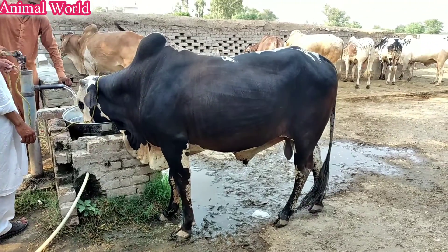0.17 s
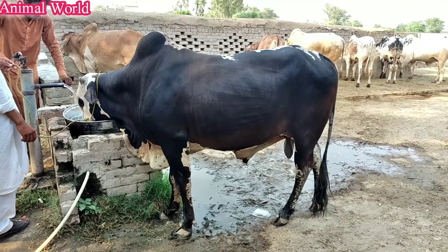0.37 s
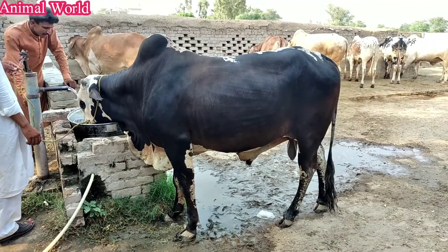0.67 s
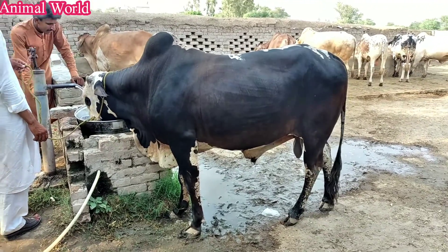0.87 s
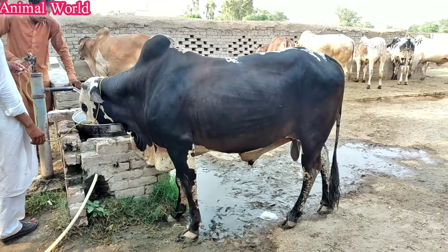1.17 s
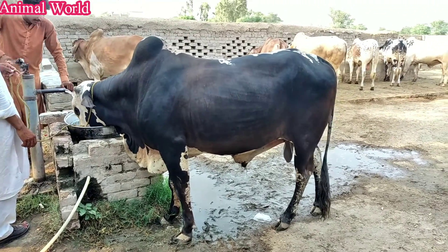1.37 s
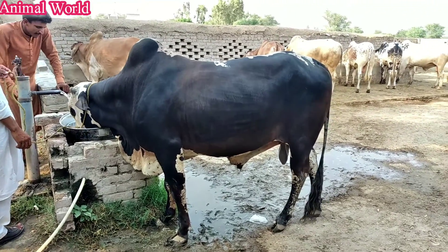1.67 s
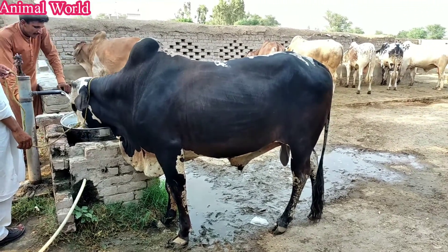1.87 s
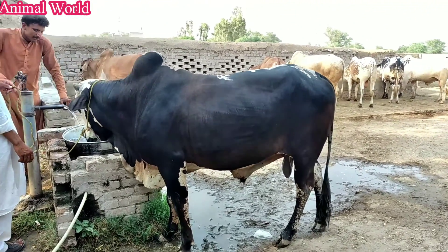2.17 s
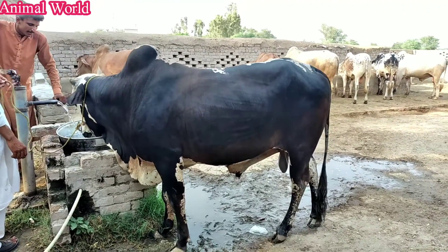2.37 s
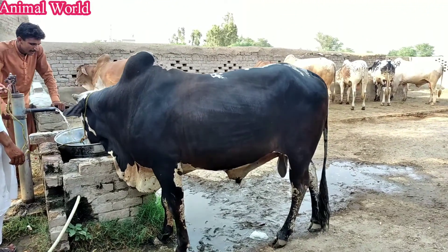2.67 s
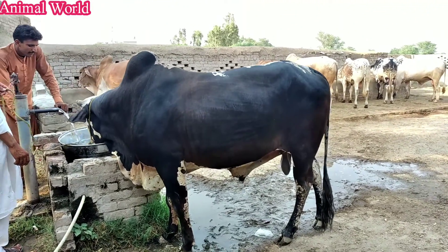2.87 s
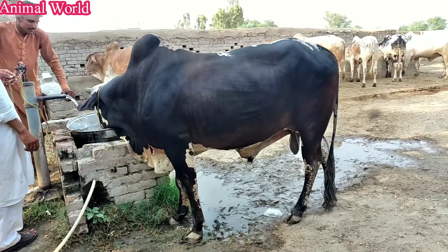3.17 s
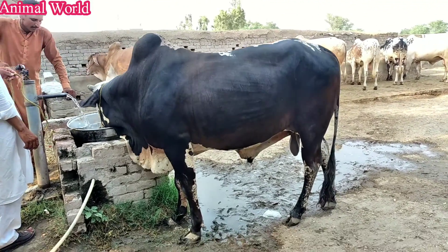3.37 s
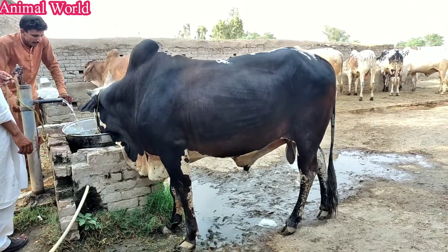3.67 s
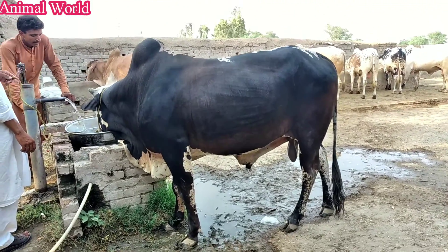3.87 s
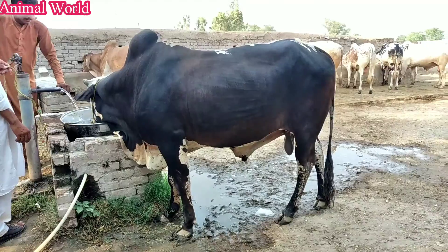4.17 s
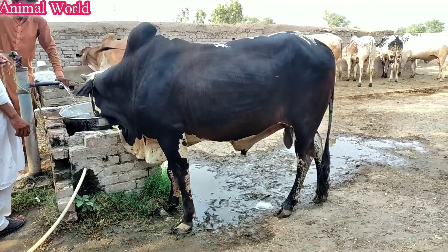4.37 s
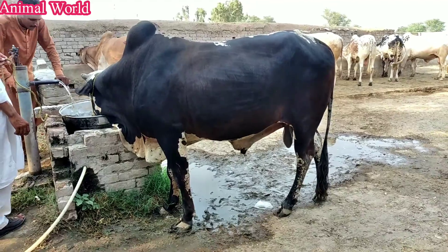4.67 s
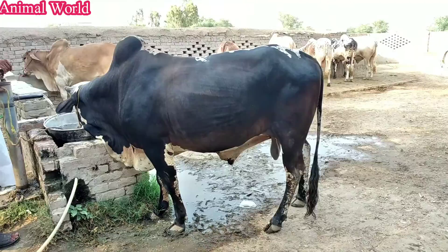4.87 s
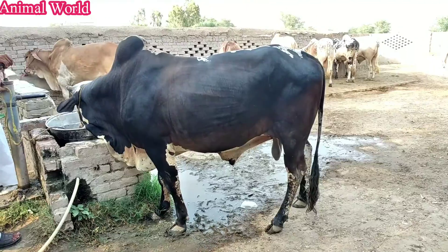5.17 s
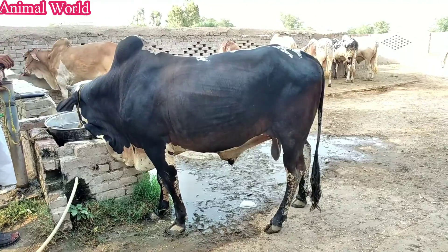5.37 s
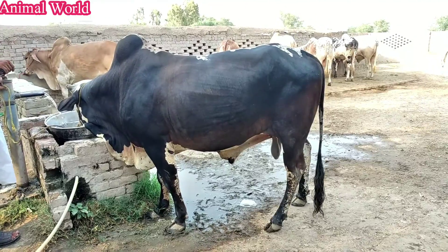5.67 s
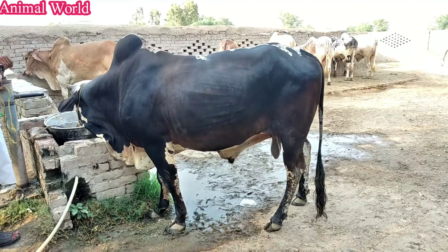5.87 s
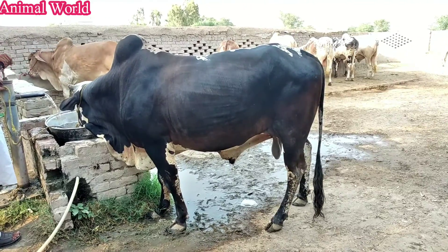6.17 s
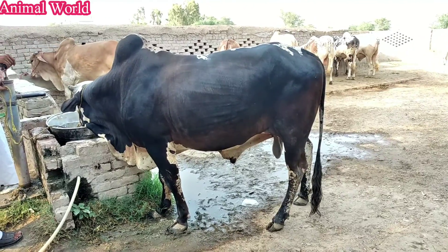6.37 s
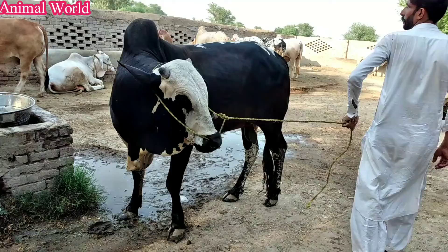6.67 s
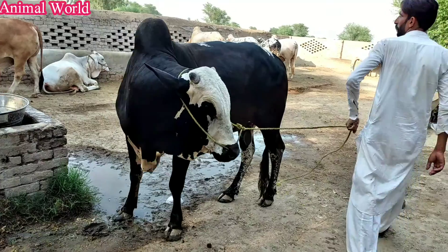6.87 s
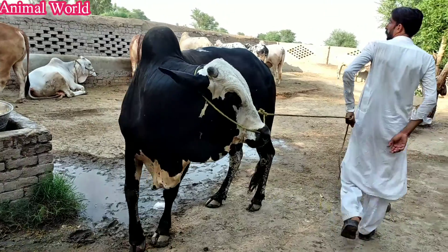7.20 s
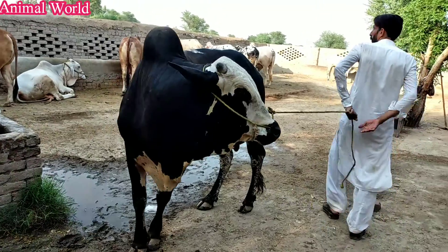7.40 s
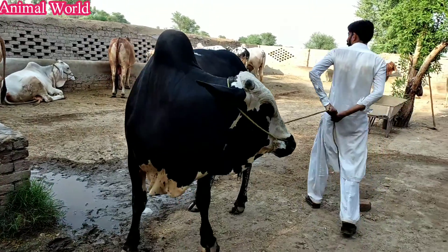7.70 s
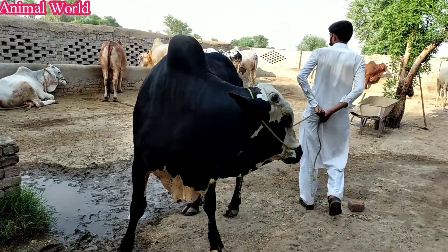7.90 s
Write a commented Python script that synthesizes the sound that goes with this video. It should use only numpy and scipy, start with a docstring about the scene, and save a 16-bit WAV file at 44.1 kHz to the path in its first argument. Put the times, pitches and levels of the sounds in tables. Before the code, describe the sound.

Rhythmic ringing knocks and rattles of a hand water pump, its pipe booming and gurgling over a faint yard murmur.

```python
"""Iron knocks, rattles and scrapes: a hand pump is worked beside a drinking bull in an open farm yard.
Rod and handle set the iron ringing; the air in the pipe booms at a pitch set by the water, which glugs
and sprays. The pivot squeaks, brick walls answer, the yard murmurs and a far engine beats for a while.
We listen from three spots in turn, through two microphone ports and a noise suppressor that shuts
the treble between strokes."""
import sys
import numpy as np
from scipy import signal
from scipy.io import wavfile
from scipy.ndimage import uniform_filter1d, minimum_filter1d

SR = 44100
rng = np.random.default_rng(int(sys.argv[2]) if len(sys.argv) > 2 else 0)


def dump(signal):
    """Clip the signal to [-1, 1] and save it as 16-bit WAV at the path in sys.argv[1]."""
    limited = np.clip(np.atleast_2d(signal).T, -1, 1)
    pcm = np.round(limited * 32767).astype(np.int16)
    wavfile.write(sys.argv[1], SR, pcm)


N = 354475

# Blows of rod and handle. Each row: start in seconds, body, ring and treble in relative dB, clank in Hz.
BLOWS = [(0.025, -41, -44, -37, 2220), (0.08, -28.5, -35.5, -27.5, 1390), (0.183, -24.5, -29, -28, 1960),
         (0.2175, -34, -64, -32, 1600), (0.4267, -39.5, -33.5, -36.5, 1320),
         (0.4812, -39, -37, -38.5, 2000), (0.508, -30.5, -20, -27, 2390), (0.532, -28.5, -20.5, -33, 2370),
         (0.5431, -18, -22.5, -29, 2490), (0.5766, -34, -40.5, -58, 2830), (0.8573, -33.5, -69, -42, 2020),
         (0.9358, -44.5, -35.5, -85, 2070), (1.0743, -34, -70, -38.5, 2660), (1.1553, -53, -37, -34, 1354),
         (1.194, -21, -26.5, -26, 2560), (1.232, -34.5, -39, -35.5, 2410),
         (1.457, -46.5, -43.5, -45.5, 1390), (1.5337, -34, -34, -28, 2500), (1.589, -20, -29.5, -33, 2530),
         (2.125, -32.5, -74, -37.5, 2566), (2.188, -27.5, -36, -33, 2420), (2.214, -28.5, -34, -29, 2030),
         (2.2683, -24.5, -24, -31.5, 2430), (2.301, -34, -35, -29.5, 2430), (2.487, -39, -37, -47.5, 1620),
         (2.5405, -35.5, -26, -34, 2700), (2.5889, -30, -21.5, -31.5, 1460), (2.613, -16.5, -63, -27, 2216),
         (3.0744, -43, -63, -41.5, 1750), (3.133, -27.5, -65, -30, 1720), (3.147, -30, -66, -41, 2750),
         (3.2022, -32, -24, -27, 1351), (3.239, -31, -41, -28, 1404), (3.26, -57, -37, -32, 2200),
         (3.276, -21.5, -38, -29, 2370), (3.312, -41, -59, -35.5, 1630), (3.49, -37.5, -41.5, -65, 1500),
         (3.5564, -25.5, -27.5, -30.5, 1630), (3.6112, -18, -50, -28, 1740),
         (4.1267, -35, -45.5, -40.5, 2506), (4.1971, -24, -23, -25.5, 1350),
         (4.252, -20, -25.5, -24.5, 1345), (4.4855, -42.5, -33, -44, 1440),
         (4.5399, -30, -19.5, -33.5, 1680), (4.591, -26.5, -39, -27, 1660), (4.6073, -19, -23.5, -57, 2370),
         (4.9415, -38, -37, -69, 1560), (4.9746, -41.5, -25, -51, 2650), (5.023, -10.5, -17, -33, 2630),
         (5.486, -26, -39, -46, 2560), (5.496, -18.5, -17.5, -45, 2550), (5.612, -32, -63, -32.5, 2470),
         (5.7698, -19, -33, -41, 2350), (5.8, -22, -25.5, -43, 2270), (5.849, -41.5, -30.5, -34, 2060),
         (5.92, -24, -46, -31.5, 2620), (5.9474, -12.5, -22, -31.5, 1700), (6.4274, -37, -44, -60, 1820),
         (6.7308, -28.5, -29, -73, 1336), (6.769, -33.5, -27, -48, 2626), (6.839, -43, -64, -29, 2570),
         (6.8775, -32, -41, -52, 1670), (6.889, -66, -68, -28.5, 2580), (6.9524, -65, -44, -33, 2350),
         (6.986, -35, -43, -29, 2600), (6.994, -21, -25, -25.5, 2590), (7.023, -42.5, -30.5, -35, 1510),
         (7.2, -43.5, -46, -35, 1544), (7.2568, -35, -47, -22.5, 2490), (7.276, -22.5, -18, -57, 1790),
         (7.308, -13.5, -23, -26.5, 2305), (7.4107, -40, -59, -36, 1940), (7.6475, -17.5, -52, -27, 1870),
         (7.6667, -24.5, -19.5, -62, 1670), (7.717, -49, -24.5, -62, 1720)]
# The handle's modes, main ring first. Each row: pitch in Hz, relative dB, nominal t60 in seconds.
IRON_MODES = [(1071, 0, .065), (870, -18, .04), (1240, -20, .03), (1830, -24, .05), (2620, -18, .05)]
# Tone of the clatter and of the spray. Each row: frequency in Hz, relative level in dB.
CLATTER_EQ = [(47, -53.5), (80, -20.5), (232, -16.5), (404, -0.5), (643, -19), (1070, -4), (1170, -5),
              (1860, -4.5), (2380, -3.5), (3030, -9.5), (6740, -9.5), (16000, -32)]
SPRAY_EQ = [(3000, -38.5), (4600, -35), (5200, -10.5), (6000, -13), (7300, -11), (8200, -22.5),
            (11300, -20.5), (13000, -47.5), (16000, -51.5)]
# Water fizzing from the spout. Each row: time in seconds, relative level in dB.
TRICKLE_FADER = [(6.8, -87), (6.84, -64.5), (7.75, -49.5), (7.84, -97)]
# Hollow notes of the air above the water. Each row: start in seconds, level in dB, pitch in Hz.
PIPE_NOTES = [(0.003, -33, 377), (0.085, -28, 349.5), (0.184, -34, 425), (0.486, -29.5, 489.7),
              (0.546, -34.5, 288), (0.863, -40, 356), (0.939, -36, 399), (1.086, -43, 321),
              (1.195, -34, 423), (1.468, -41.5, 394), (1.536, -33, 467), (1.591, -23, 366.5),
              (2.146, -43, 294), (2.261, -31.5, 304), (2.488, -38.5, 417), (2.543, -31.5, 407),
              (2.569, -27, 491), (2.616, -21.5, 260.8), (2.66, -32.5, 258), (2.71, -35.5, 258),
              (3.272, -28, 423.5), (3.485, -40.5, 410), (3.56, -28.5, 411), (3.608, -27.5, 447),
              (4.255, -26.5, 353.4), (4.485, -34.5, 414.3), (4.537, -28, 396), (4.605, -34.5, 337),
              (4.647, -30, 331), (5.03, -38.5, 395), (5.496, -55, 375), (5.951, -37.5, 490),
              (6.993, -28.5, 397), (7.203, -37.5, 429), (7.312, -14, 412.3), (7.367, -31, 433),
              (7.668, -20.5, 370)]
# Low knocks of the stand. Each row: start in seconds, level in dB, pitch in Hz.
STAND_THUMPS = [(0.545, -14.5, 129), (1.6, -28.5, 145.6), (1.897, -27.5, 174.4), (2.275, -25.5, 125),
                (2.619, -25.5, 130.8), (3.275, -16, 122.8), (4.259, -24, 225), (6.732, -20.5, 147),
                (6.998, -16.5, 123.4)]
# Glugs in the pipe. Each row: start and length in seconds, level in dB.
GLUGS = [(0.533, 0.074, -32.5), (1.573, 0.075, -31), (3.583, 0.1, -32), (4.59, 0.061, -32.5),
         (7.259, 0.039, -32), (7.691, 0.037, -28)]
# Thin squeaks. Each row: start and length in seconds, level in dB, opening pitch in Hz.
PIVOT_SQUEAKS = [(2.95, 0.137, -62, 2530), (3.452, 0.14, -59.5, 2655), (5.717, 0.054, -48, 1520)]
# Wavering tones in the murmur. Each row: pitch and width in Hz, level in dB.
MURMUR_TONES = [(668, 41, -71), (1030, 220, -59)]
# Tone of the murmur. Each row: frequency in Hz, relative level in dB.
YARD_EQ = [(22, -7.5), (45, 2), (108, -18.5), (256, -9), (510, -9), (665, -7), (1610, -14.5), (1800, -10.5),
           (2630, -25.5), (3350, -25.5), (5000, -29), (6500, -65), (11000, -120)]
# The far engine. Each row: time in seconds, level in dB.
ENGINE_FADER = [(4.88, -103), (4.92, -56), (6.0, -56.5), (6.7, -65), (6.74, -86)]
# Listening spots. Each row: start in seconds, lag of the left port in samples.
LISTENING_SPOTS = [(0, 10.5), (4.9, 20), (6.72, 14.5)]
# The pump's colour at the middle spot. Each row: frequency in Hz, relative level in dB.
MIDDLE_SPOT_EQ = [(300, -6), (1000, -3.5), (2600, 1.5), (4000, -4), (8000, -10.5), (11000, 1),
                  (16000, -21.5)]
# Stereo tilt. Each row: frequency in Hz, left over right in dB.
PORT_BALANCE = [(60, -3.5), (300, 1), (700, -2), (1400, 3.5), (3000, 3.5), (6000, 18.5), (8500, -2),
                (15000, -10)]
# Stereo focus. Each row: frequency in Hz, likeness of the ports from 0 to 1.
PORT_LIKENESS = [(60, 0.31), (300, 1), (1150, 0.93), (1600, 0.54), (4000, 0.14), (15000, 0.039)]

REF_BLOW_DB, RATTLE_T60_S = -27, 0.23  # a medium blow and its decay
RATTLE_SHORTENS, RISE_SHORTENS = 0.3, 0.45  # harder blows seat and rise sooner: dB of time per dB
TREBLE_T60_S, THUMP_T60_S = 0.11, 0.056
BODY_CRACK_DB, TREBLE_CRACK_DB, CRACK_T60_S = 7, 10.5, 0.024  # first crack above the rattle
SCRAPE_DB, SCRAPE_DB_PER_S = -10, 601.5  # the scrape into a blow: last level re the blow, growth
STILL_AFTER_S = 0.055  # after this long a rest, a blow's attack rises from silence
BOOM_REF_HZ, BOOM_LOW_LINGERS = 420, 0.48  # deeper notes last longer: power of pitch
BOOM_HOLD_S, BOOM_CLOSE_S, BOOM_SAG_DB_PER_S = 0.046, 0.008, 132.5  # at BOOM_REF_HZ
BOOM_AFTER_DB, BOOM_T60_S = -13.5, 0.27  # faint after-ring, at BOOM_REF_HZ
SQUEAK_RISE = 0.062  # share by which the pitch climbs
CLICK_S, CLICK_DB, CLICK_HALF_WIDTH_S = 6.7327, -1.5, 0.0003
YARD_DB, BAND_LIMIT_HZ = -54, 15950


def pump():
    """Rattling blows drive the iron's modes, the loose rod's clank, a broad clatter and the spray."""
    (body, ring, treble), clank_hz = blows()
    t = np.arange(N) / SR
    rattle = contacts(per_s=1200, spread_db=5.5)
    low = body * rattle
    high = treble * contacts(per_s=690, spread_db=3.5)
    sway = wander(rng.standard_normal(N), 1200)  # the loose rod never sits still
    out = iron(body, ring, rattle, sway)
    out += amp(-1) * resonate(low, clank_hz * (1 + 0.013 * sway), 80)
    for drive, side in (low, "low"), (high, "high"):
        crossover = signal.butter(3, 3300, side, fs=SR, output="sos")
        out += amp(6.5) * signal.sosfilt(crossover, coloured(drive, CLATTER_EQ))
    out += spray(treble, rattle)
    at_middle = (t > LISTENING_SPOTS[1][0]) & (t < LISTENING_SPOTS[2][0])
    top_mode = amp(-7) * ring * sine(IRON_MODES[-1][0] * (1 + 0.01 * sway))  # faces the middle spot
    return np.where(at_middle, amp(-9) * coloured(out + top_mode, MIDDLE_SPOT_EQ), out)


def blows():
    """The rod scrapes in, cracks and seats: body, ring and treble envelopes, and the held clank pitch."""
    drive, t = np.zeros((3, N + SR)), np.arange(SR // 4) / SR
    seated_db = -60 * np.maximum(t - 0.062, 0) / 0.056  # seating stops the rattle
    crack = 1 + amp([[BODY_CRACK_DB], [-60], [TREBLE_CRACK_DB]] - 60 * t / CRACK_T60_S)
    previous = -1
    for start, db, ring_db, treble_db, _ in BLOWS:
        at = round(start * SR)
        t60 = RATTLE_T60_S * amp(-RATTLE_SHORTENS * (db - REF_BLOW_DB))
        fade_db = -60 * t / np.array([[t60], [min(t60, IRON_MODES[0][2])], [TREBLE_T60_S]])
        onset_db = SCRAPE_DB if start - previous < STILL_AFTER_S else -60
        softness = amp(-RISE_SHORTENS * (max(db, treble_db) - REF_BLOW_DB))
        rise_s = softness * np.array([[0.0035], [0.004], [0.0045]])
        attack = 1 - (1 - amp([[onset_db], [-60], [onset_db]])) * np.exp(-t / rise_s)
        levels_db = [[db - 10], [ring_db + 10.5], [treble_db - 8.5]]
        drive[:, at:at + len(t)] += attack * crack * amp(fade_db + seated_db + levels_db)
        scrape_db = SCRAPE_DB - SCRAPE_DB_PER_S * t[:at][::-1]
        drive[::2, at - len(scrape_db):at] += amp(scrape_db + [[db - 10], [treble_db - 13]])
        previous = start
    starts, *_, clank_hz = np.transpose(BLOWS)
    latest = np.maximum(np.searchsorted(starts, np.arange(N) / SR) - 1, 0)
    return drive[:, :N], clank_hz[latest]


def iron(body, ring, rattle, sway):
    """The handle rings with one clear tone and a faint lower partial; rattle keeps its modes alive."""
    t = np.arange(N) / SR
    width_times_t60 = np.log(1000) / np.pi
    (hz, db, t60), *other_modes = IRON_MODES
    phase = 2 * np.pi * hz * t
    out = amp(db + 2.5) * ring * (np.sin(phase) + 0.17 * np.sin(0.84 * phase))
    shake = (ring + 0.21 * body) * rattle
    # the gripping hand blurs the main mode
    out += amp(db - 10) * resonate(shake, hz * (1 + 0.035 * sway), 2 * width_times_t60 / t60)
    for hz, db, t60 in other_modes:
        out += amp(db - 5.5) * resonate(body * rattle, hz, width_times_t60 / t60)
    return out


def pipe_booms():
    """Each jolt sounds the air column: an unsteady note that holds until the water closes over it."""
    out, t = np.zeros(N + SR), np.arange(SR // 3) / SR
    wobbles, flutters, sloshes = rng.standard_normal((len(PIPE_NOTES), 3, len(t))).transpose(1, 0, 2)
    motion = zip(wander(wobbles, 500), wander(flutters, 350), unit_rms(band(sloshes, 110, 650)))
    for (start, db, hz), (wobble, flutter, slosh) in zip(PIPE_NOTES, motion):
        age = t * (hz / BOOM_REF_HZ) ** BOOM_LOW_LINGERS
        closing = 1 + np.exp(np.minimum((age - BOOM_HOLD_S) / BOOM_CLOSE_S, 50))
        held = amp(-BOOM_SAG_DB_PER_S * age) / closing
        tail = amp(BOOM_AFTER_DB - 60 * age / BOOM_T60_S)
        attack = 1 - np.exp(-t / 0.0018)
        note = amp(2.3 * flutter) * sine(hz * (1 + 0.041 * wobble)) + 0.36 * slosh * np.exp(-t / 0.034)
        place(out, start, amp(db) * attack * (held + tail) * note)
    return out[:N]


def stand_thumps():
    """Short low pushes of the pump stand put weight under the blows."""
    out, t = np.zeros(N + SR), np.arange(SR // 4) / SR
    attack = 1 - np.exp(-t / 0.0051)
    for start, db, hz in STAND_THUMPS:
        place(out, start, attack * amp(db - 60 * t / THUMP_T60_S) * np.sin(2 * np.pi * hz * t))
    return out[:N]


def glugs():
    """Large short bubbles of random size glug in the pipe after the heavy strokes."""
    t, out = np.arange(N) / SR, np.zeros(N)
    gate = sum(amp(db) * np.clip((t - start) / 0.0056, 0, 1)
               * np.clip((start + length - t) / 0.013 + 1, 0, 1) for start, length, db in GLUGS)
    pops = amp(5.3 * rng.standard_normal(N)) * (rng.random(N) < 300 / SR)
    size = rng.integers(0, 6, N)
    for k, hz in enumerate(np.geomspace(240, 680, num=6)):
        cycles = np.arange(0, 12, hz / SR)
        envelope = (1 - np.exp(-cycles)) * np.exp(-cycles / 3.1)
        bubble = envelope * np.sin(2 * np.pi * cycles * (1 + 0.009 * cycles))
        out += signal.oaconvolve(pops * (size == k), bubble)[:N]
    return gate * unit_rms(out)


def spray(jolts, rattle):
    """Each jolt throws a spray that fizzes out; late on, the spout trickles and sloshes in the bowl."""
    fade = amp(-60 / (0.3 * SR)) ** 2  # t60 of 0.3 s
    trickle = fader(TRICKLE_FADER)
    envelope = np.sqrt(signal.lfilter([1 - fade], [1, -fade], jolts ** 2) + trickle ** 2)
    slosh = trickle * unit_rms(band(rattle, 790, 2200))
    fizz = coloured(envelope * contacts(per_s=1500, spread_db=5.5), SPRAY_EQ)
    return amp(-4.5) * slosh + amp(-5) * fizz


def pivot_squeaks():
    """The pivot gives short fluttering whistles that swell, climb and fade."""
    out = np.zeros(N + SR)
    for start, length, db, hz in PIVOT_SQUEAKS:
        progress = np.arange(0, length, 1 / SR) / length
        flutter_db = 8.1 * wander(rng.standard_normal(len(progress)), 150)
        whistle = sine(hz * (1 + SQUEAK_RISE * progress))
        place(out, start, amp(db + flutter_db) * np.sin(np.pi * progress) * whistle)
    return out[:N]


def left_click():
    """A sharp click, almost only on the left, as the listening spot changes."""
    pulse = np.exp(-0.5 * ((np.arange(N) / SR - CLICK_S) / CLICK_HALF_WIDTH_S) ** 2)
    return amp([[CLICK_DB], [CLICK_DB - 46]]) * pulse


def wall_echoes(x):
    """Sparse echoes from low brick walls, a separate pattern for each port."""
    taps = np.zeros((2, SR // 3))
    grid = np.arange(80, SR // 3 - 20, 20)
    arrivals = grid + rng.integers(0, 20, (2, len(grid)))
    np.put_along_axis(taps, arrivals, rng.choice([-1., 1.], arrivals.shape), 1)
    taps *= amp(-60 * np.arange(SR // 3) / SR / 0.17)  # t60 of 0.17 s
    return signal.oaconvolve(x[None], taps / np.linalg.norm(taps[0]), axes=1)[:, :N]


def murmur_tones():
    """Faint wavering tones: noise in slowly drifting resonances."""
    drifts, swells, noises = rng.standard_normal((len(MURMUR_TONES), 3, N)).transpose(1, 0, 2)
    voices = zip(MURMUR_TONES, wander(drifts, 9000), wander(swells, 6000), noises)
    return sum(amp(db + 4.2 * swell) * resonate(noise, hz * (1 + 0.021 * drift), width)
               for (hz, width, db), drift, swell, noise in voices)


def yard_murmur():
    """A patchy bed of wind, trickling water and herd."""
    frames, hz = N // 256 + 5, np.fft.rfftfreq(1024, 1 / SR)
    noise = rng.standard_normal((frames, 513, 5)).T
    left, apart = noise[0] + 1j * noise[1], noise[2] + 1j * noise[3]
    patches_db = 3.2 * wander(uniform_filter1d(noise[4], 8, axis=0), 10)
    likeness = at_hz([(50, 0.92), (300, 0.86), (800, -0.047), (1500, -0.6), (5000, 0.77)], hz)[:, None]
    right = likeness * left + np.sqrt(1 - likeness ** 2) * apart
    spectra = np.array([left, right]) * amp(at_hz(YARD_EQ, hz)[:, None] + patches_db)
    bed = unit_rms(signal.istft(spectra, nperseg=1024, noverlap=768)[1][:, :N])
    return amp([[YARD_DB + 0.5], [YARD_DB - 0.5]]) * bed


def far_engine():
    """Uneven firings blur into a low, beating rumble."""
    firing_hz = 20.5 * (1 + 6 * uniform_filter1d(rng.standard_normal(N), 2000))
    firings = np.diff(np.floor(np.cumsum(firing_hz) / SR), prepend=0) * amp(2.8 * rng.standard_normal(N))
    rough = unit_rms(firings) + 1.5 * rng.standard_normal(N)
    return fader(ENGINE_FADER) * unit_rms(band(band(rough, 55, 180), 55, 180))


def ports(x):
    """The left port hears later and is shaded differently; part of each band reaches it scattered."""
    hz, t, spectrum = signal.stft(x, SR, nperseg=512)
    starts, lags = np.transpose(LISTENING_SPOTS)
    lag = lags[np.searchsorted(starts, t, "right") - 1]
    likeness = at_hz(PORT_LIKENESS, hz)[:, None]
    band_phase = np.exp(2j * np.pi * rng.random((len(hz) // 4 + 1, 1))).repeat(4, 0)[:len(hz)]
    time_phase = 1j ** rng.integers(0, 4, len(t) // 8 + 1).repeat(8)[:len(t)]
    left = spectrum * (likeness + np.sqrt(1 - likeness ** 2) * band_phase * time_phase)
    left *= np.exp(-2j * np.pi * hz[:, None] * lag / SR)
    tilt = amp(at_hz(PORT_BALANCE, hz)[:, None] / 2)
    return signal.istft(np.array([left * tilt, spectrum / tilt]), SR, nperseg=512)[1][:, :N]


def contacts(per_s, spread_db):
    """Uneven tiny impacts over a little smooth rubbing."""
    hits = amp(spread_db * np.minimum(rng.exponential(1, N), 3.5)) * (rng.random(N) < per_s / SR)
    return unit_rms(unit_rms(hits * rng.choice([-1., 1.], N)) + 0.5 * rng.standard_normal(N))


def resonate(x, hz, width_hz):
    """A resonance that follows hz and keeps white noise near its level."""
    turn = np.exp(2j * np.pi * np.cumsum(hz * np.ones(N)) / SR)
    pole = np.exp(-np.pi * width_hz / SR)
    return np.sqrt(2 * (1 - pole ** 2)) * (turn * signal.lfilter([1], [1, -pole], x / turn)).real


def coloured(x, eq):
    """Causal EQ of unit energy."""
    log_gain = np.log(amp(at_hz(eq, abs(np.fft.fftfreq(4096, 1 / SR)))))
    taps = np.fft.ifft(np.exp(log_gain - 1j * signal.hilbert(log_gain).imag)).real[:2048]
    return signal.oaconvolve(x, taps / np.linalg.norm(taps))[:N]


def band(x, lo_hz, hi_hz):
    return signal.sosfilt(signal.butter(2, [lo_hz, hi_hz], "bandpass", fs=SR, output="sos"), x)


def amp(db):
    return 10 ** (np.asarray(db) / 20)


def unit_rms(x):
    return x / np.sqrt(np.mean(x ** 2) + 1e-20)


def wander(noise, samples):
    return unit_rms(uniform_filter1d(noise, samples))


def sine(hz):
    return np.sin(2 * np.pi * np.cumsum(hz) / SR)


def at_hz(points, hz):
    point_hz, values = np.transpose(points)
    return np.interp(np.log(hz + 1), np.log(point_hz + 1), values)


def fader(points):
    return amp(np.interp(np.arange(N) / SR, *np.transpose(points)))


def place(track, start_s, sound):
    track[round(start_s * SR):][:len(sound)] += sound


def scene():
    """The pump up front, the walls around it, yard and engine behind."""
    near = pump() + pipe_booms() + stand_thumps() + glugs() + pivot_squeaks() + murmur_tones()
    return ports(near) + amp(-6.5) * wall_echoes(near) + left_click() + yard_murmur() + far_engine()


def record(dry):
    """The suppressor shuts the treble when it sinks near the noise; capsule roll-off, hiss, band limit."""
    hz, _, spectra = signal.stft(dry, SR, nperseg=512)
    treble_db = 10 * np.log10((abs(spectra[:, hz > 3300]) ** 2).sum((0, 1)) + 1e-14)
    held_db = -minimum_filter1d(-treble_db, size=5, origin=2)  # stays open a moment longer
    gate_db = -30 / (1 + np.exp(np.clip(held_db + 61.5, -30, 30)))  # threshold at -61.5 dB
    gated_band = np.clip((hz[:, None] - 2800) / 500, 0, 1)
    rolloff_db = -6 * (hz[:, None] / 14000) ** 4
    out = signal.istft(spectra * amp(gate_db * gated_band + rolloff_db), SR, nperseg=512)[1][:, :N]
    out += amp(-89) * rng.standard_normal((2, N))
    lowpass = signal.firwin(511, BAND_LIMIT_HZ, window=("kaiser", 9), fs=SR)
    return signal.oaconvolve(out, lowpass[None], "same")


dry = scene()
out = record(dry)
dump(out)
```